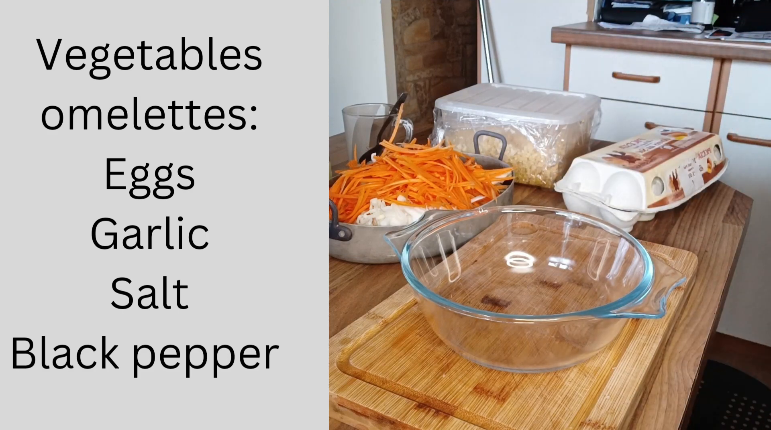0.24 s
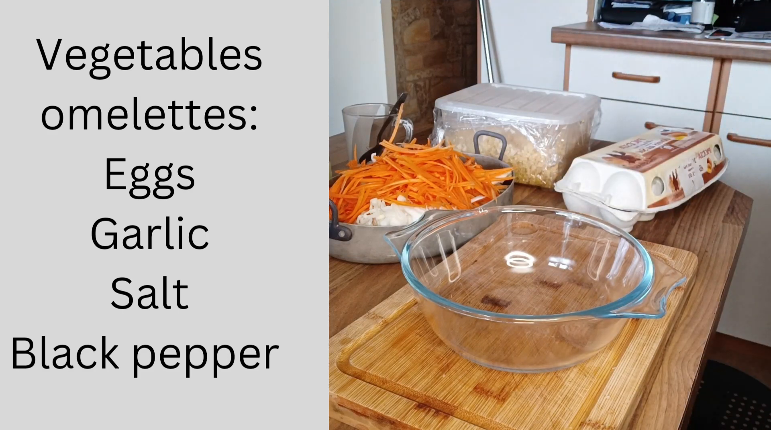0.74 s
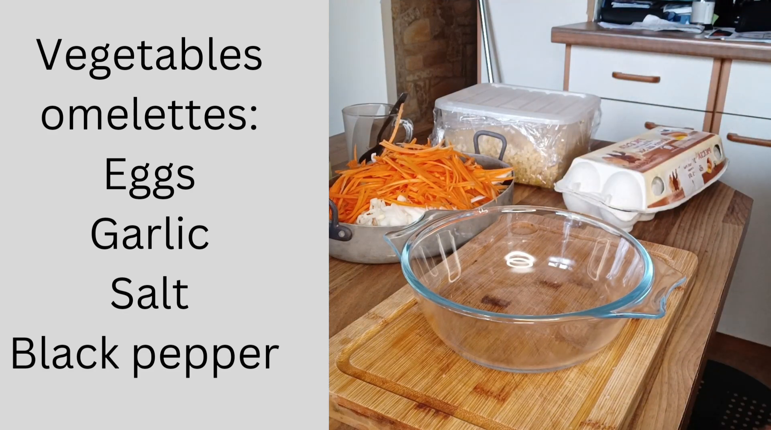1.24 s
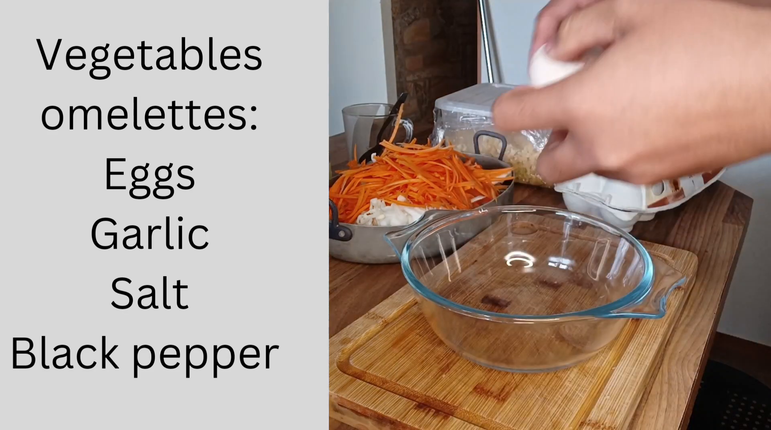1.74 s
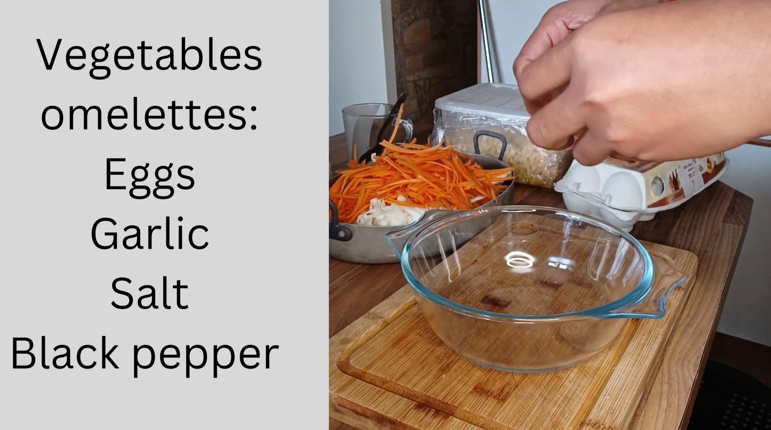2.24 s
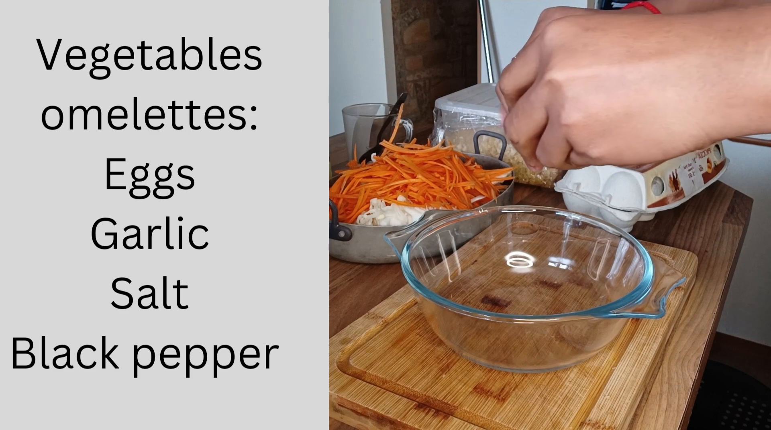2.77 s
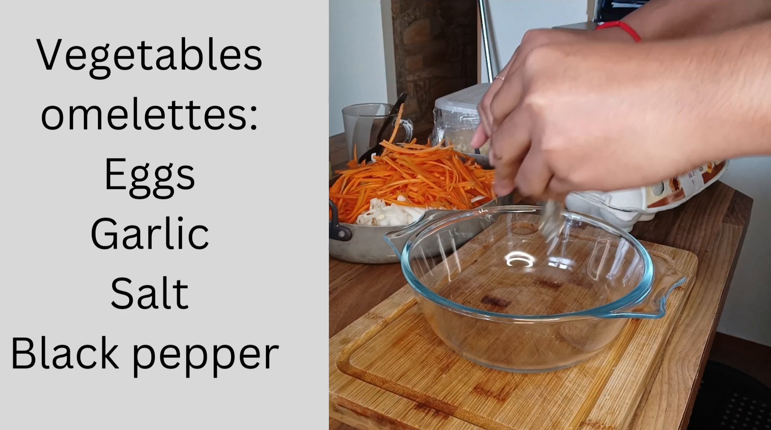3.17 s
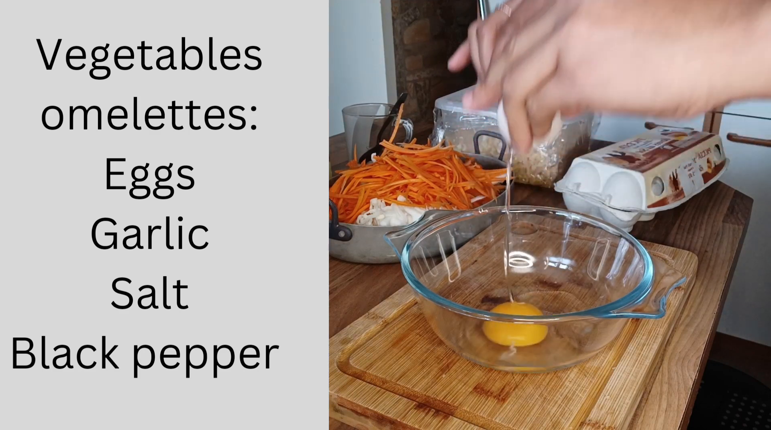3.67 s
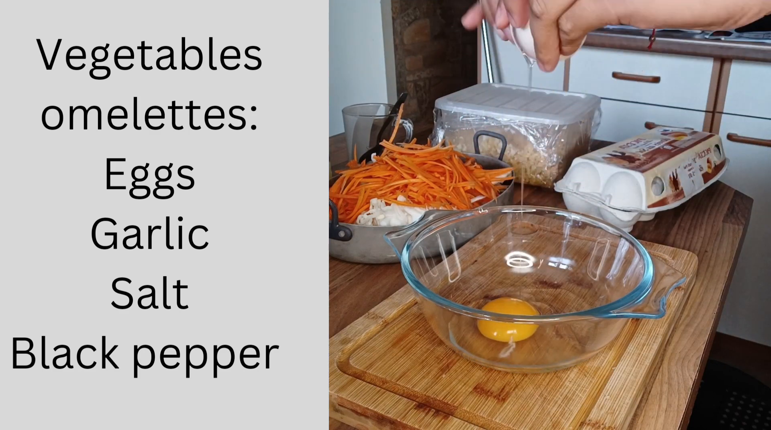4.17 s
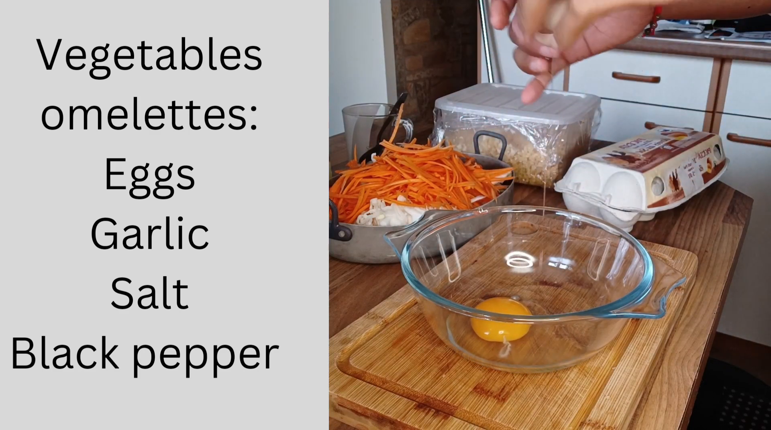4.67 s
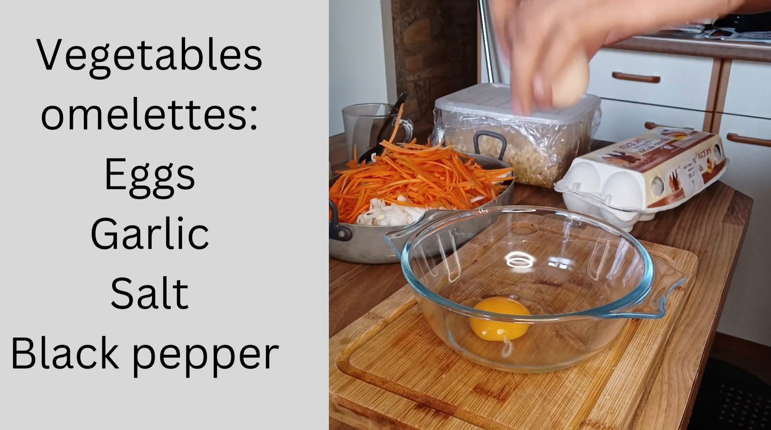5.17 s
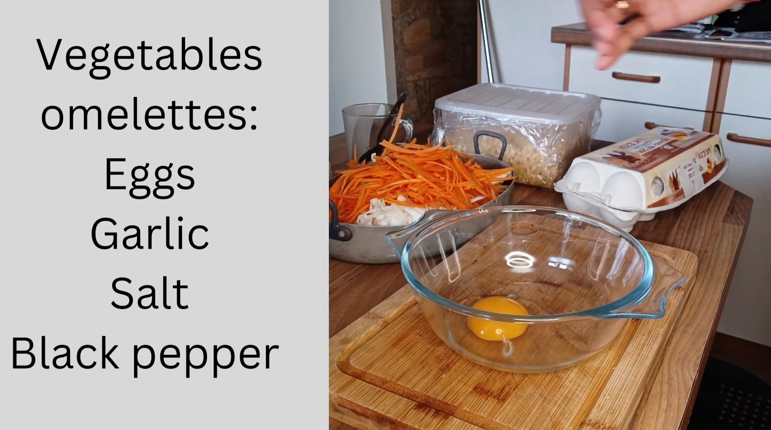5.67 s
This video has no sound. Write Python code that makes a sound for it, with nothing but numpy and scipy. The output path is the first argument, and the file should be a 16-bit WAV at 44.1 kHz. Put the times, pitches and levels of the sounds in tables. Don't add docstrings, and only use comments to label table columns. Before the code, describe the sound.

Two loud egg knocks on a hard edge ring through a kitchen, followed by tiny shell cracks, soft wet pops and light clicks over faint hum.

```python
import sys
import numpy as np
from scipy import signal
from scipy.fft import rfft, irfft
from scipy.io import wavfile
from scipy.ndimage import map_coordinates

SR = 44100
rng = np.random.default_rng(int(sys.argv[2]) if len(sys.argv) > 2 else 0)


def unload_wav(signal):
    wavfile.write(
        sys.argv[1],
        SR,
        np.round(np.clip(np.atleast_2d(signal).T, -1, 1) * 32767).astype(np.int16),
    )


def magnitude_from_level(level_db):
    exponent = np.asarray(level_db, float) / 20
    return 10 ** exponent


N = 261072

# t/s, peak level/dB, echo level/dB, held flat/s, echo T60/s
KNOCKS = [
    (.7743, -9.5, -8.5, 0.03107, 0.3834),
    (1.2279, -7.5, -12, 0.0074, 0.316),
]
# echo level/dB, crack level/dB, slope/dB per octave, T60/s
KNOCK_TREBLE = [(-17, -12, -3.5, 0.383), (-13, -12, 0, 0.3084)]
# f/Hz, density/dB per Hz
FIRST_ECHO = [(45, -32.5), (75, -9), (125, -14), (165, -4.5), (266, -14), (420, -12.5), (740, -5),
              (1090, -7), (1400, 0), (1800, -6), (2150, -16.5), (2950, -16), (3600, -40.5), (5500, -91.5)]
# f/Hz, density/dB per Hz
SECOND_ECHO = [(45, -43.5), (80, 2.5), (155, -0.5), (262, -12.5), (322, -3), (600, -9), (870, -8.5),
               (1030, -2), (1550, -7), (1840, -23), (2150, -11), (3100, -21), (4500, -28.5), (6000, -93)]
# f/Hz, level/dB, T60/s
FIRST_MODES = [(166.6, -1, 0.088), (323.3, -7, 0.35), (501, -11, 0.81), (571, -11, 0.24), (807, -6.5, 1.5),
               (921, -12, 1.7), (1007, -4.5, 0.75), (1195, -6.5, 0.68), (1335, -15.5, 5.0), (1561, -5, 2.1),
               (1750, -4.5, 0.41), (1970, -13.5, 1.2), (2250, -28, 5.0), (2896, -12.5, 0.17)]
# f/Hz, level/dB, T60/s
SECOND_MODES = [(175, 2, 0.17), (324.3, 0, 0.44), (506, -1, 0.17), (652, 1.5, 0.077), (995, -10.5, 1.0),
                (1220, -13, 0.9), (1400, -5.5, 0.39), (1540, -10, 0.14), (1636, -22, 0.28),
                (2163, -11, 0.3), (2290, -15.5, 0.52), (2680, -30, 0.29), (3160, -17.5, 0.19),
                (3060, -14.5, 0.21)]

# t/s, peak level/dB, ring f/Hz, ring T60/s
TAPS = [(2.4002, -47, 2240, 0.0032), (2.4203, -26.5, 1336, 0.0044), (2.4452, -29, 1574, 0.00373),
        (2.4206, -34.5, 2825, 0.0052), (3.0786, -35, 1830, 0.0062), (3.0806, -35, 1676, 0.0064),
        (3.0878, -29, 2050, 0.00204), (3.0972, -36.5, 2390, 0.01), (3.1113, -32.5, 2998, 0.0117),
        (3.1235, -35, 2535, 0.0107), (3.1432, -29, 2258, 0.0113), (3.1768, -32.5, 2120, 0.0124),
        (3.2715, -47.5, 1410, 0.0107)]
# t/s, peak level/dB, ring f/Hz, ring T60/s
SPLIT = [
    (3.0784, -34, 5454, 0.0062),
    (3.0796, -34, 6200, 0.0064),
    (3.0828, -39, 9830, 0.0092),
]
# t/s, peak level/dB, ring f/Hz, ring T60/s
HALVES = [(3.584, -29, 1935, 0.00516), (3.5845, -36.5, 2383, 0.0087), (3.5863, -39, 1430, 0.0092),
          (3.7315, -47, 2450, 0.0084), (3.799, -49, 2280, 0.0089), (3.802, -46, 2670, 0.0061),
          (3.8121, -44.5, 2380, 0.0054), (4.2588, -45.5, 2154, 0.01), (4.2626, -44.5, 3040, 0.0066),
          (4.3268, -45, 2055, 0.0045), (4.3423, -45.5, 2100, 0.0082), (4.5744, -41.5, 2300, 0.0085),
          (4.577, -30.5, 2075, 0.0085), (4.5865, -38, 2460, 0.0074), (4.618, -38, 2000, 0.0055),
          (4.6218, -33, 2340, 0.0044), (4.6634, -41.5, 2035, 0.0089), (4.8604, -46.5, 1736, 0.0022),
          (4.88, -53, 2920, 0.0045), (5.0219, -36.5, 1809, 0.011), (5.0222, -55.5, 3708, 0.0145),
          (5.0224, -64, 5240, 0.0204), (4.3262, -56.5, 6500, 0.0095)]
# t/s, peak level/dB, ring f/Hz, ring T60/s
POPS = [(3.249, -51, 3020, .016), (3.3195, -56, 3150, .016), (3.3502, -40, 1780, .02),
        (3.364, -50, 1700, .014), (3.3635, -53, 3250, .013), (3.377, -56, 3230, .016),
        (3.459, -56, 1750, .012), (3.4772, -53, 3600, .016), (3.5356, -44.5, 1870, .015),
        (3.5432, -52, 1850, .012), (3.5612, -43, 1900, .009), (3.5616, -50, 2550, .009),
        (3.5684, -44, 1950, .009), (3.569, -51, 2550, .009)]
# t/s, peak level/dB, slope/dB per octave
CRACKS = [(0.524, -63.5, 0), (2.3381, -60, 9.5), (2.419, -37.5, 0.5), (2.4441, -35, -4.5),
          (2.752, -54, 0.5), (2.7902, -54.5, -1), (2.853, -56, 2.5), (2.8983, -58, 7.5),
          (2.9525, -57.5, 10), (2.9905, -63, -5), (3.0867, -34, 1), (3.1111, -35.5, 2), (3.143, -40, -7.5),
          (3.3513, -55.5, -4), (3.3654, -47, -0.5), (3.5369, -61, 4), (3.5851, -38, 8.5),
          (3.732, -53.5, 8.5), (3.8116, -49, -1), (4.152, -69.5, 2.5), (4.2619, -47.5, 3.5),
          (4.3259, -49.5, 6.5), (4.3426, -46.5, 3.5), (4.49, -64.5, 5), (4.577, -53, 2),
          (4.62, -37.5, -0.5), (4.814, -59, 2), (4.86, -51, -7.5), (4.91, -56.5, -4), (5.0213, -52.5, -5),
          (2.385, -58.5, 6), (3.069, -55.5, 4.5), (3.473, -55.5, 5.5), (3.4756, -54, 6),
                (3.0801, -35, -9.5), (3.5687, -55, -1.5), (3.592, -55.5, 16), (3.798, -58, -1),
                (4.2586, -57.5, -1), (4.311, -52.5, -11)]

# delay/s, level/dB
BOWL = (.0072, -11)
# f/Hz, density/dB per Hz
PORT = [(2060, -31), (3500, -10.5), (4430, -11), (5290, -10), (5460, -10), (7750, -7.5), (9560, 0),
        (11000, -9.5), (16000, -19)]
# f/Hz, level/dB
SHELF = (3250, -10)
# opens t/s, shuts t/s, lift/dB
BURSTS = [(0.762, 1.047, 16), (1.202, 1.441, 16), (2.38, 2.554, 13), (3.067, 3.246, 11.5),
          (3.559, 3.633, 16.5), (3.79, 3.871, 1), (4.267, 4.441, 3), (4.551, 4.709, 12.5), (4.841, 5.02, 4),
          (5.02, 5.124, 2.18)]
# opens t/s, shuts t/s, lift/dB
AJAR = [(0.991, 1.632, 4), (2.723, 3.005, 3.5), (3.043, 3.896, 4.5), (3.599, 3.917, 2), (4.137, 4.218, 4.5),
        (4.596, 6.2, 2.5)]

# f/Hz, density/dB per Hz
RUMBLE = [(15, -61), (25, -33.5), (69, -13), (78, -8.5), (92, -6), (114, -7), (124, -14.5), (201, -10),
          (244, -16.5), (550, -19.5), (720, -48), (1210, -120)]
# f/Hz, density/dB per Hz
AIR = [(410, -20), (700, -3), (767, -6.5), (1080, -7.5), (1260, -5.5), (1500, -6), (1640, -4), (2020, -6.5),
       (2300, -8), (4260, -23.5), (6830, -27.5), (9350, -17), (11500, -30.5), (16000, -37)]
# f/Hz, width/Hz, level/dB
FAN = [(99.3, 18, -79), (205, 45, -84.5), (1669, 46, -83), (2330, 30, -85), (3467, 25, -99),
       (4160, 25, -99), (4950, 25, -95.5)]
# f/Hz, rms level/dB
HUM = [
    (595.5, -73.5),
    (100.63, -74),
]

LOW_HZ, TOP_HZ = 66.6, 16068
RUMBLE_DB, AIR_DB = -68.5, -69.5
ROOM_T60 = 0.319
REST_DB, RISE_S, CLOSE_S, FLICKER_DB = -2, 0.06, 0.0166, 1.0065
DRY_HOLD_S, WET_HOLD_S = 0.0487, 0.085
TAP_ECHO_DB, POP_ECHO_DB, CRACK_ECHO_DB, ECHO_PER_RING_DB = -16.5, -21.5, -14, 1.5
SHADED, SHADE_FROM_DB = 0.0667, -64


def knocks():
    out, t = np.zeros(N + SR), np.arange(SR // 2) / SR
    colours, mode_sets = (FIRST_ECHO, SECOND_ECHO), (FIRST_MODES, SECOND_MODES)
    for knock, colour, modes, treble in zip(KNOCKS, colours, mode_sets, KNOCK_TREBLE):
        s, db, echo_db, flat_s, body_t60 = knock
        top_db, crack_db, slope_db, top_t60 = treble

        def fall(t60):
            onset = 1 - np.exp(-t / 0.00023)
            return onset / np.sqrt(1 + magnitude_from_level(60 * (t - flat_s) / t60) ** 2)

        flutter = magnitude_from_level(0.63 * wobble(58.6)[:len(t)])
        body = noise(len(t), lambda hz: magnitude_from_level(along(colour, hz)) * shelf(hz)) * fall(body_t60)
        tones = np.zeros(len(t))
        for hz, level, life in modes:
            tone = np.sin(2 * np.pi * (hz * t + rng.random()))
            tones += magnitude_from_level(level - 10.0) * tone * fall(np.clip(life, 0.12, 0.36))
        shutting = 1 / (1 + np.exp((t - flat_s - 0.23) / 0.02))
        top = magnitude_from_level(top_db) * noise(len(t), port(slope_db)) * fall(top_t60) * shutting
        echo = (0.991 * body + tones) * (0.5 + 0.5 * shutting) + top
        crack_shape = (1 - np.exp(-t / 0.0006)) * magnitude_from_level(crack_db - 60 * t / 0.014)
        crack = crack_shape * noise(len(t), port(slope_db))
        add(out, s, magnitude_from_level(db + echo_db) * flutter * echo + magnitude_from_level(db) * crack)
    return highpass(out[:N], 4, LOW_HZ)


def rings(rows, wall_db, lone_s, blur, onset, overtone_db):
    out, t = np.zeros(N + SR), np.arange(SR // 4) / SR
    for s, db, ring_hz, t60 in rows:
        echo_db = wall_db + ECHO_PER_RING_DB * np.log2(100 * t60) + shade_db(db)
        turns = 2 * np.pi * ring_hz * t
        overtone = np.sin(rng.uniform(1.326, 1.559) * turns)
        tone = np.sin(turns) + magnitude_from_level(overtone_db) * overtone
        ring = magnitude_from_level(5 - 60 * t / t60) * tone * (1 - np.exp(-t / (onset * t60))) ** 2
        echo = noise(len(t), lambda hz: band(hz, ring_hz, blur / t60) ** 1.14 * shelf(hz))
        echo = echo * magnitude_from_level(1.82 * wobble(97.7)[:len(t)])
        echo = echo * answer(t, echo_db, held(s, lone_s))
        add(out, s, magnitude_from_level(db) * (ring + echo))
        add(out, s + BOWL[0], magnitude_from_level(db + BOWL[1]) * ring)
    return highpass(out[:N], 2, 600)


def shell_taps():
    rows = TAPS + SPLIT + HALVES
    return rings(rows, TAP_ECHO_DB, DRY_HOLD_S, blur=5.42, onset=0.0413, overtone_db=-11.5)


def wet_pops():
    return 1.6 * rings(POPS, POP_ECHO_DB, WET_HOLD_S, blur=2.5, onset=0.11, overtone_db=-20)


def cracks():
    out, t = np.zeros(N + SR), np.arange(SR // 4) / SR
    for s, db, slope_db in CRACKS:
        shape = magnitude_from_level(-4.5 - 60 * t / 0.0171) * (1 - np.exp(-t / 0.00044))
        snap = noise(len(t), port(slope_db)) * shape
        envelope = answer(t, CRACK_ECHO_DB + shade_db(db), held(s, DRY_HOLD_S))
        echo = noise(len(t), port(slope_db)) * envelope
        add(out, s, magnitude_from_level(db) * (snap + echo))
        add(out, s + BOWL[0], magnitude_from_level(db + BOWL[1]) * snap)
    return out[:N]


def shade_db(db):
    return SHADED * (SHADE_FROM_DB - db)


def answer(t, echo_db, shut):
    closing = 1 / (1 + np.exp((t - shut) / 0.016))
    return magnitude_from_level(echo_db - 60 * t / ROOM_T60) * closing * (1 - np.exp(-t / 0.00423))


def port(slope_db):
    def gain(hz):
        octaves = np.log2(np.maximum(hz, 3000)) - 13
        return magnitude_from_level(along(PORT, hz) + slope_db * octaves) * (hz > 2000)
    return gain


def shelf(hz):
    return magnitude_from_level(SHELF[1] / (1 + (SHELF[0] / (hz + 1)) ** 24))


def held(s, lone_s):
    left = [shuts - s for opens, shuts, _ in BURSTS if opens <= s + 0.005 < shuts]
    return max([lone_s] + left)


def opening():
    t = np.arange(N) / SR
    gain_db = REST_DB + FLICKER_DB * wobble(15)
    for opens, shuts, lift_db in BURSTS + AJAR:
        rise = 1 - np.exp(-np.maximum(t - opens, 0) / RISE_S)
        close = (1 - np.tanh((t - shuts) / CLOSE_S / 2)) / 2
        gain_db = gain_db + lift_db * rise * close
    return gain_db


def kitchen():
    open_db = opening()
    rumble = magnitude_from_level(RUMBLE_DB - 1.5 + open_db) * noise(N, lambda hz: magnitude_from_level(along(RUMBLE, hz)))
    air_db = AIR_DB + 0.84 * open_db + 0.44 * wobble(27)
    air = magnitude_from_level(air_db) * noise(N, lambda hz: magnitude_from_level(along(AIR, hz)))
    fan = sum(magnitude_from_level(db) * noise(N, lambda hz: band(hz, c_hz, w_hz) ** 2) for c_hz, w_hz, db in FAN)
    unsteady_db = 1.5 * wobble(11)
    drift = 2 * np.pi * np.cumsum(0.8 * wobble(1.2)) / SR
    t = np.arange(N) / SR
    whine = sum(magnitude_from_level(db + 5.0) * np.sin(2 * np.pi * hz * t + drift) for hz, db in HUM)
    return rumble + air + fan * magnitude_from_level(0.64 * open_db) + whine * magnitude_from_level(0.54 * open_db + unsteady_db)


def unit(x):
    return x / np.sqrt(np.mean(x ** 2) + 1e-20)


def along(points, hz):
    f, v = np.transpose(points)
    return np.interp(np.log(hz + 1), np.log(f + 1), v)


def noise(size, gain):
    hz = np.fft.rfftfreq(size, 1 / SR)
    spectrum = rfft(rng.standard_normal(size)) * gain(hz) * (hz < TOP_HZ)
    return unit(irfft(spectrum, size))


def band(hz, centre_hz, width_hz):
    return hz * width_hz / np.abs(centre_hz ** 2 - hz ** 2 + 1j * hz * width_hz)


def wobble(rate):
    knots = rng.standard_normal(int(N * rate / SR) + 4)
    return map_coordinates(knots, [np.arange(N) * rate / SR])


def highpass(x, order, cut_hz):
    return signal.sosfilt(signal.butter(order, cut_hz, "high", fs=SR, output="sos"), x)


def add(track, s, sound):
    track[round(s * SR):][:len(sound)] += sound


def scene():
    return (knocks() + shell_taps() + cracks() + wet_pops() + kitchen())[None]


def band_limit(x):
    return signal.sosfilt(signal.butter(12, 16800, fs=SR, output="sos"), x)


def record(dry):
    mix = signal.sosfilt(signal.cheby2(12, 60, 17200, fs=SR, output="sos"), dry)
    return band_limit(mix)


dry = scene()
out = record(dry)
unload_wav(out)
```